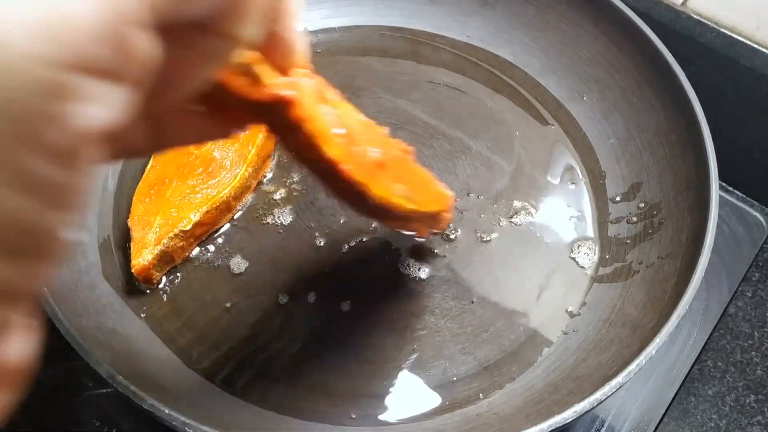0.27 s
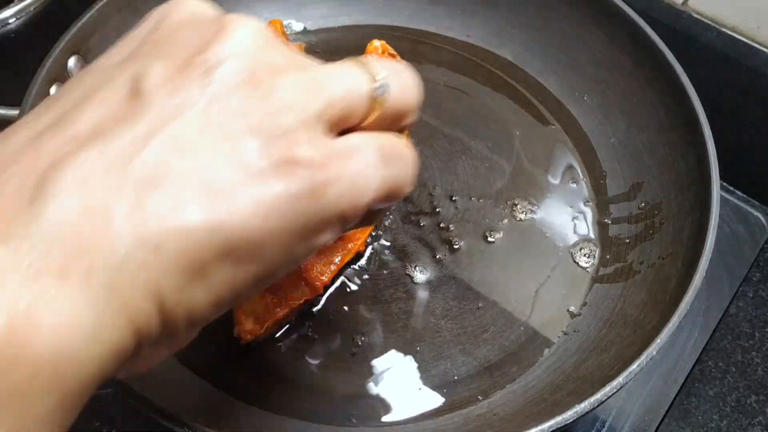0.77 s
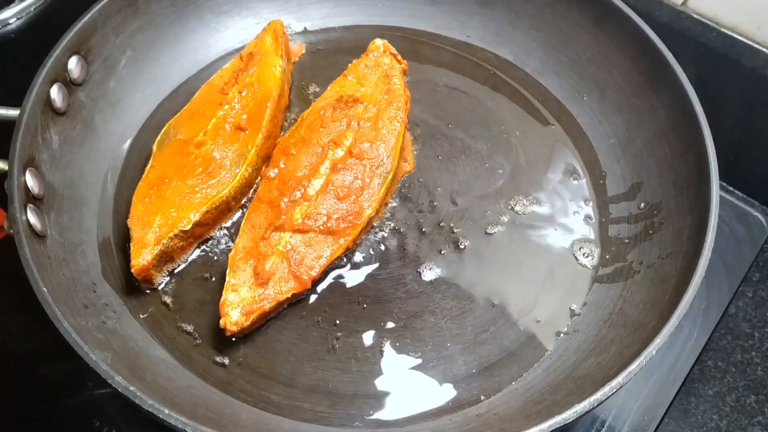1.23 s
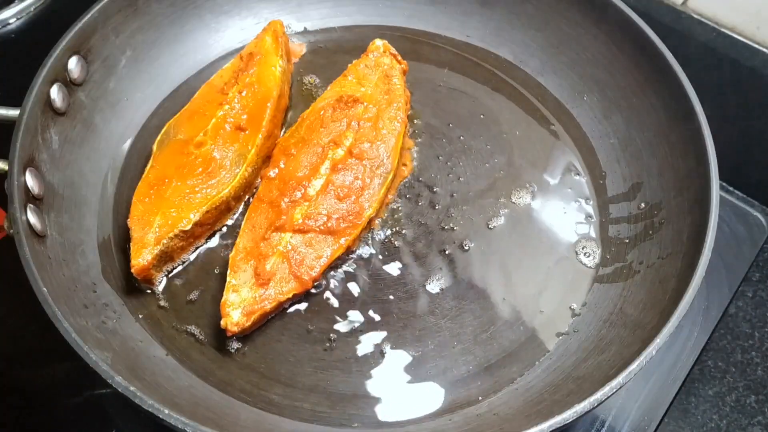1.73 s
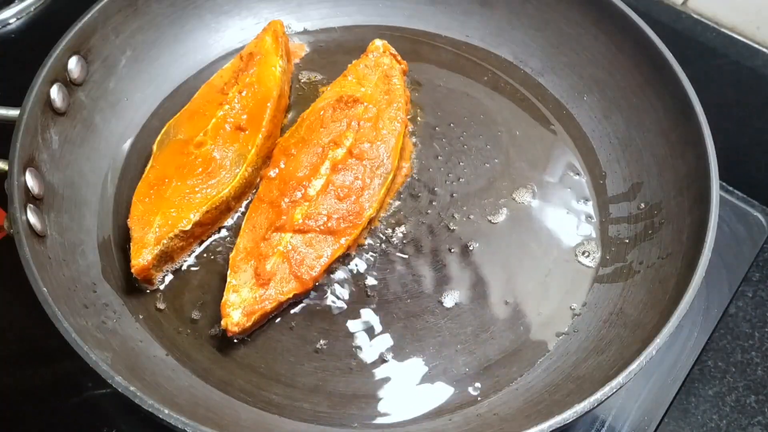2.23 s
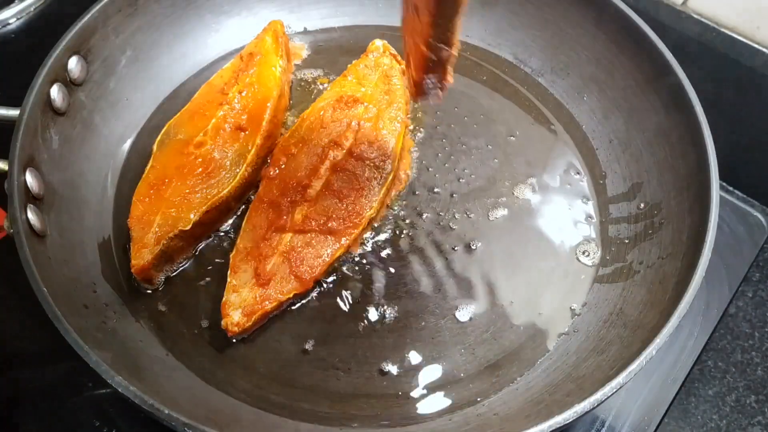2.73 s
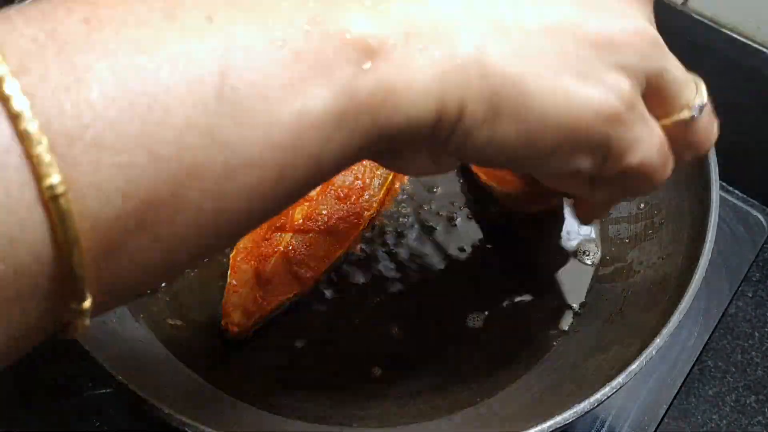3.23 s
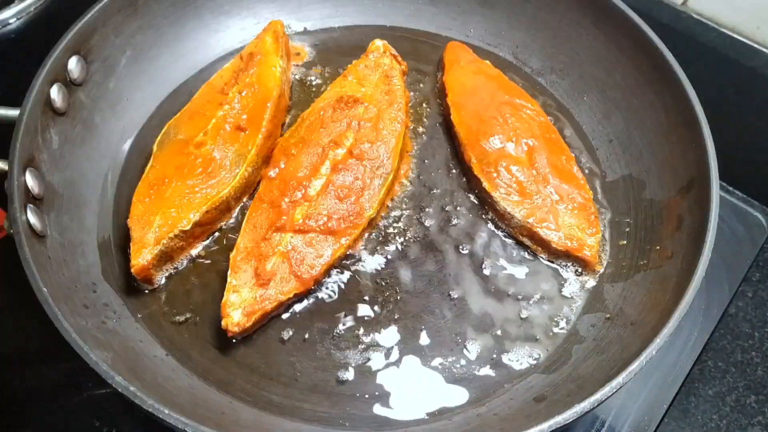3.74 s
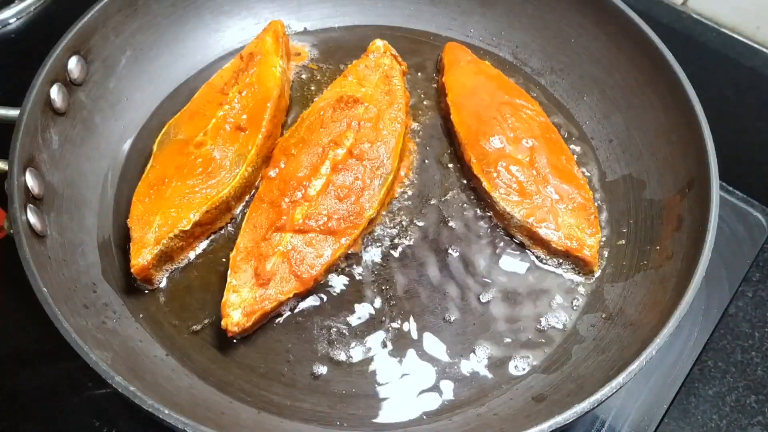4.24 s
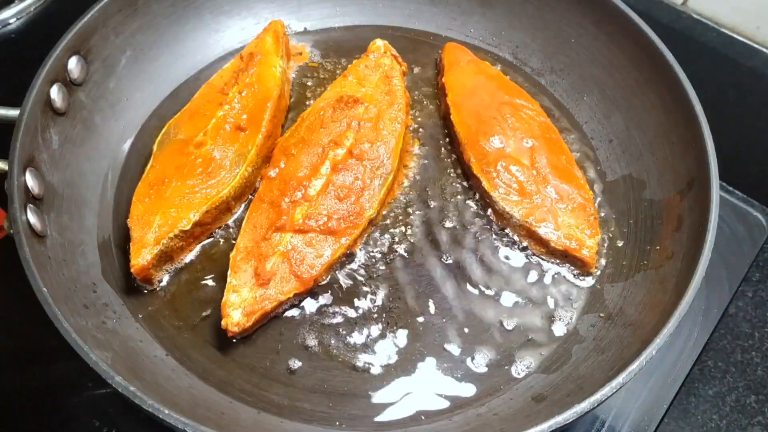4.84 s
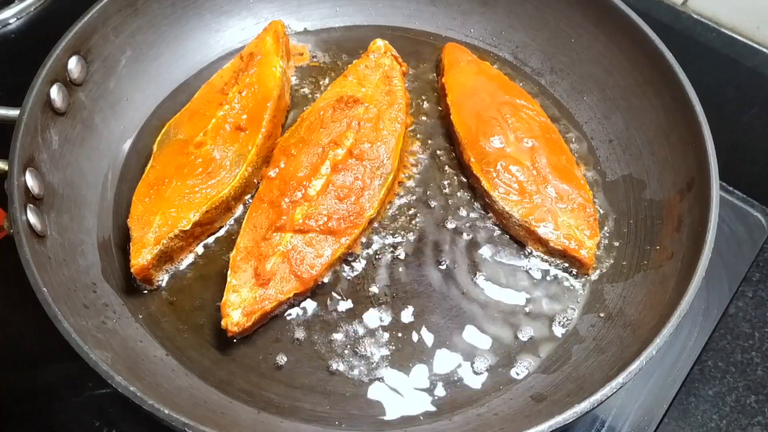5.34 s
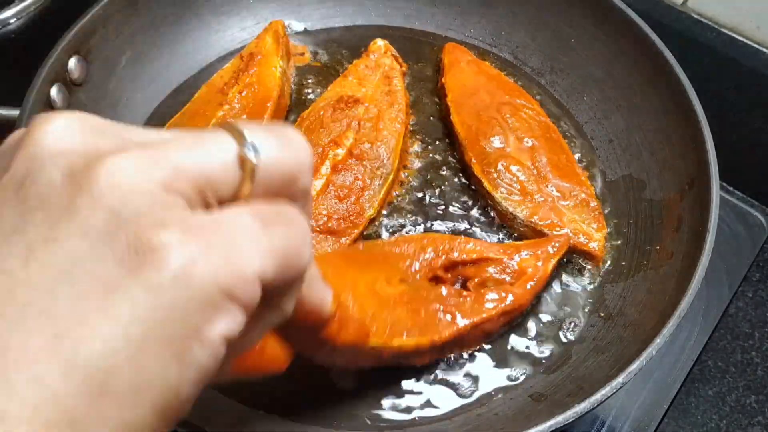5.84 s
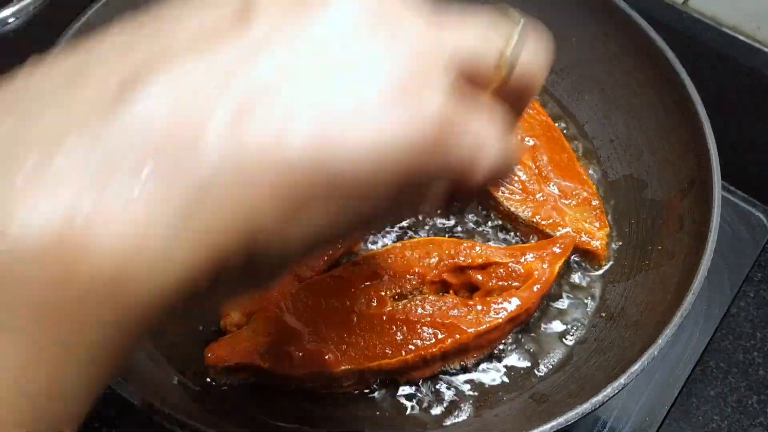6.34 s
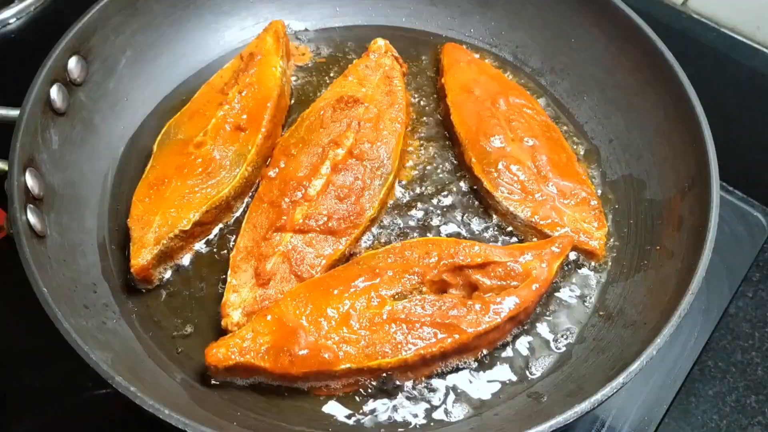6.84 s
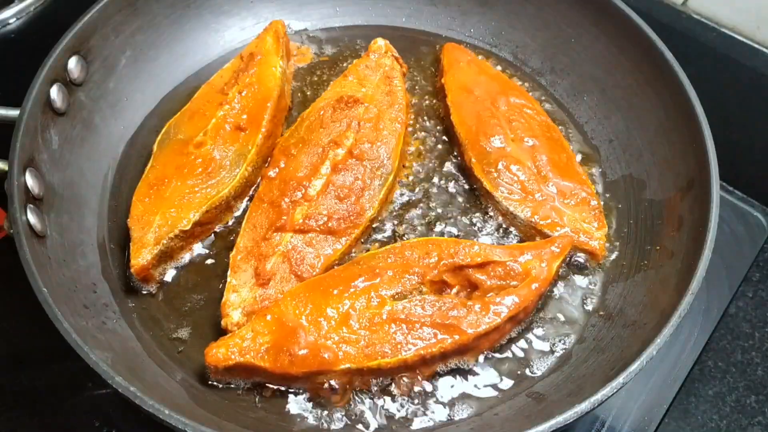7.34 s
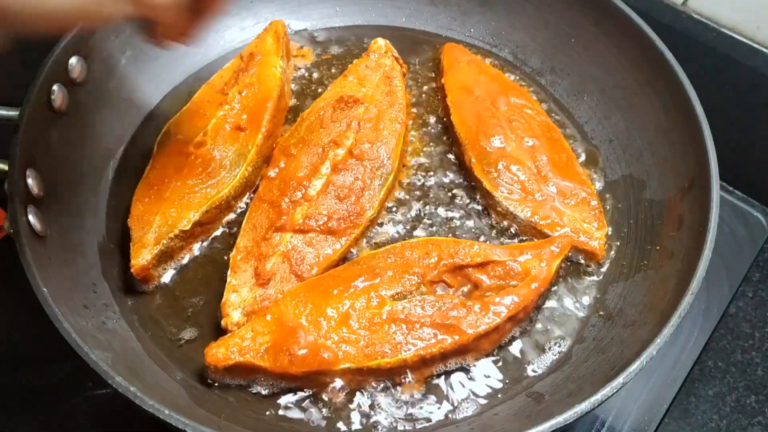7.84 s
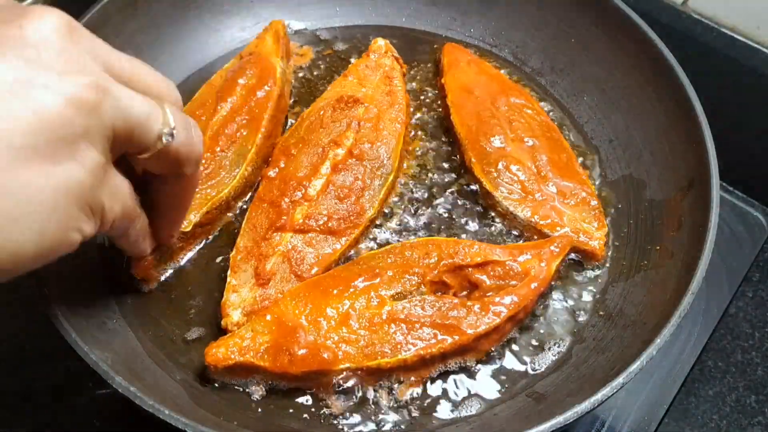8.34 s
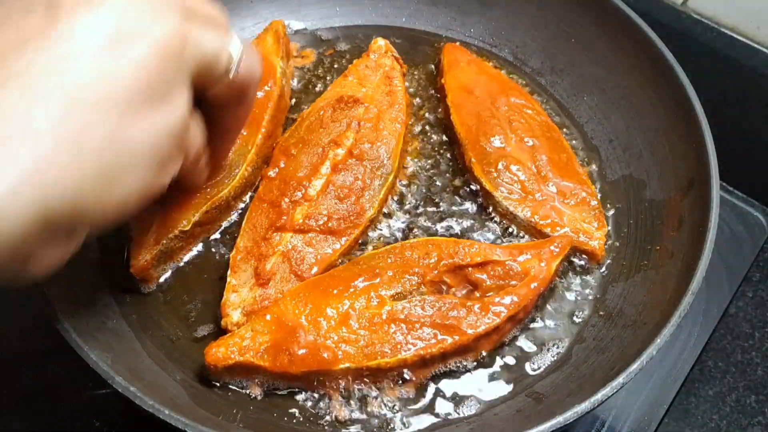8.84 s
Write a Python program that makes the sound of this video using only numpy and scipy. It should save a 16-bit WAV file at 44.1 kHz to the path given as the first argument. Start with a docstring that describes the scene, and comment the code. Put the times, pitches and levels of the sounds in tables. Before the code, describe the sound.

Hot oil quietly crackles and spits in a pan, then wet fish sets off a loud steady sizzle, cutting abruptly to calmer, duller frying.

```python
"""Fish steaks frying in a steel pan

Close over the pan with a two-port microphone, in a kitchen with a running fan.
The oil simmers as swarms of ringing bubbles over hiss, with noise jets spitting and damped bursts popping.
A wet steak sets off a roar of steam bubbles; at 7.74 s a cut with a short fade leads to calmer, duller frying.
Behind it lie filtered noise for air, duct whistles, murmur and rumble, and a hum of wavering sines."""
import sys
import numpy as np
from scipy import signal
from scipy.fft import rfft, irfft
from scipy.io import wavfile
from scipy.ndimage import uniform_filter1d

SR = 44100
rng = np.random.default_rng(int(sys.argv[2]) if len(sys.argv) > 2 else 0)


def inscribe(sig):
    """Save sig as 16-bit PCM at rate SR to the path in sys.argv[1].

    A 1-D sig is mono; a 2-D sig holds one channel per row.
    Samples are clipped to [-1, 1] before scaling.
    """
    pcm = np.round(np.clip(np.atleast_2d(sig).T, -1, 1) * 32767)
    wavfile.write(sys.argv[1], SR, pcm.astype(np.int16))


N = 400869
T = np.arange(N) / SR  # time axis, s
HZ = np.fft.rfftfreq(N, 1 / SR)  # frequency axis, Hz

# likeness of the two ports for the roaring oil: hz, likeness (0-1), right_leads_rad
ROAR_LIKENESS = [(300, .88, 0), (1000, .75, .5), (2400, .33, 1.2), (4500, .22, 2.9), (7000, .3, 2.8),
                 (12000, .33, 3.2), (13500, .2, 4.7), (14600, .27, 6.2)]
# likeness of the two ports for the simmer and the room: hz, likeness (0-1), right_leads_rad
ROOM_LIKENESS = [(60, .96, 0), (130, .96, 0), (290, .77, 0), (700, .66, .2), (1400, .3, .6), (2400, .1, .8),
                 (3500, .2, 3.3), (8000, .25, 6.6), (14000, .08, 7)]


def simmering():
    """Hot oil simmers: sparse bubbles ring over a mostly smooth hiss."""
    # boiling strength: time_s, level_db
    strength = [(0, -29), (.1, -31.5), (.2, -27.5), (.4, -32), (.55, -32), (.9, -29.5), (1.15, -29.5),
                (1.4, -29), (1.52, -27), (1.7, -29.5), (1.82, -29.5), (1.95, -27.5), (2.2, -31),
                (2.3, -29.5), (2.4, -28), (2.6, -38)]
    # colour of the bubbles: hz, spectrum_db
    colour = [(1060, -28), (1800, -11), (2530, 3), (3470, -1.5), (3800, 3.5), (4470, -5), (5030, 4.5),
              (5550, -1.5), (15000, 0.5)]
    return boiling(strength, colour, ROOM_LIKENESS, per_s=600, spread_db=3.0, grainy=0.2,
                   flicker_db=1.2, throb_db=0.5)


def roaring():
    """The wet steak boils off steam in a dense roar of bubbles."""
    # boiling strength: time_s, level_db
    strength = [(2.42, -32), (2.47, -20), (2.54, -18), (2.575, -22.5), (2.63, -17.5), (2.71, -14.5),
                (2.77, -16), (2.81, -13), (2.83, -15), (2.87, -13.5), (2.93, -10), (3.05, -11),
                (3.17, -9.5), (3.33, -11.5), (3.51, -11.5), (4.1, -10.5), (4.77, -10), (4.83, -11.5),
                (4.88, -10), (5.41, -10), (5.46, -12), (5.7, -9.5), (5.87, -11.5), (6.16, -10),
                (6.34, -11.5), (6.67, -10.5), (7.5, -11), (7.56, -13.5), (7.74, -13)]
    # colour of the bubbles: hz, spectrum_db
    colour = [(240, -39), (400, -24), (480, -22.5), (724, -13.5), (1230, -14.5), (1460, -10.5), (1950, -16),
              (2200, -8), (2450, -11.5), (3070, -7.5), (3450, -7.5), (4100, -4.5), (4600, -7.5),
              (5370, -0.5), (5720, -4), (5990, 0.8), (6280, -4), (6560, -0.4), (7000, -1.5), (8900, 0.9),
              (11700, 1.2), (14000, 1.2), (15000, 0)]
    return boiling(strength, colour, ROAR_LIKENESS, per_s=6000, spread_db=2.4, grainy=0.42,
                   flicker_db=0.4, throb_db=0.3)


def calmer_frying():
    """Weaker boiling with a duller colour and more uneven bubbles."""
    # boiling strength: time_s, level_db
    strength = [(7.745, -22), (7.85, -21.5), (8.2, -21), (8.85, -21.5), (8.97, -20.5), (9.05, -25.5),
                (9.09, -20)]
    # colour of the bubbles: hz, spectrum_db
    colour = [(310, -38), (460, -29), (520, -10), (600, -13), (850, -5), (1150, -8), (1440, -5.5),
              (1540, -9.5), (1800, -4), (2490, -6), (2680, -6), (6070, 0.5), (12000, -1.5), (15000, -2.5)]
    # likeness of the two ports: hz, likeness (0-1), right_leads_rad
    likeness = [(300, 0.79, 1), (1010, 0.92, -0.2), (2420, 0.47, -1), (4500, 0.086, 3), (9100, 0.06, 10.5),
                (14000, 0.32, 1.5)]
    return boiling(strength, colour, likeness, per_s=4000, spread_db=3.4, grainy=0.25,
                   flicker_db=0.6, throb_db=0.6)


def boiling(rows, tone, same, per_s, spread_db, grainy, flicker_db, throb_db):
    """Swarms of tiny bubbles burst over a smooth hiss; the sound flickers, throbs and shifts in colour."""
    narrow_db, broad_db = 3.1, 1.45  # random level changes in narrow and in broader bands
    size = amp(spread_db * np.minimum(rng.exponential(1, (2, N)), 5))
    size = size * rng.choice([-1, 1], (2, N))
    bursts = bubbles(size * (rng.random((2, N)) < per_s / SR))
    hiss = rng.standard_normal((2, N))
    swarm = np.sqrt(grainy) * bursts + np.sqrt(1 - grainy) * hiss
    swarm = ports(swarm, amp(read(tone, HZ)), same)
    hz, t, z = signal.stft(swarm, SR, nperseg=512, noverlap=320)
    narrow = evened(uniform_filter1d(rng.standard_normal(z.shape[1:]), size=6, axis=1))
    broad = uniform_filter1d(rng.standard_normal(z.shape[1:]), size=8, axis=0)
    broad = evened(uniform_filter1d(broad, size=12, axis=1))
    swell = np.interp(t, T, flicker_db * drift(30) + throb_db * drift(9.8))
    treble = (1 / (1 + (2000 / (hz + 1)) ** 3))[:, None]  # the treble varies most
    change_db = treble * (narrow_db * narrow + broad_db * broad + swell)
    varied = signal.istft(z * amp(change_db), nperseg=512, noverlap=320)[1][:, :N]
    return evened(varied) * level(rows)


def bubbles(bursts):
    """Each burst rings for a few cycles at the pitch of its bubble size."""
    sizes_hz = [3000, 4500, 6700, 10000, 14500]
    width_share = .4  # width of the ring as a share of its pitch
    size, out = rng.integers(0, len(sizes_hz), N), 0
    for k, hz in enumerate(sizes_hz):
        r = np.exp(-np.pi * width_share * hz / SR)
        resonance = [1, -2 * r * np.cos(2 * np.pi * hz / SR), r * r]
        ring = signal.lfilter([1], resonance, bursts * (size == k))
        out = out + np.sqrt(hz) * evened(ring)
    return evened(out)


def gurgle():
    """Larger bubbles rumble as the wet steak settles, swelling and fading a few times a second."""
    # strength of the gurgle: time_s, level_db
    strength = [(2.6, -55), (2.7, -41), (2.88, -38), (3, -32.5), (3.2, -45), (3.5, -45), (4.5, -45),
                (6, -48), (6.9, -40), (7.74, -50)]
    # colour of the gurgle: hz, spectrum_db
    colour = [(400, -46), (620, 2), (900, -5), (1150, 3), (1500, 2), (1900, 4.5), (2250, -3.5), (2800, -24),
              (4000, -40)]
    noise = ports(rng.standard_normal((2, N)), amp(read(colour, HZ)), ROAR_LIKENESS)
    return noise * level(strength) * amp(3.34 * drift(6.6))


def spurts():
    """Each jet of steam is a gritty puff of noise that swells to its peak and dies away quickly."""
    # jets of steam: peak_s, level_db, rise_ms, centre_hz
    jets = [(.015, -23.5, 23, 11400), (0.033, -25, 7, 12100), (.062, -31, 13, 11000),
            (.141, -25, 16, 10200), (.167, -29, 18, 11400), (.197, -28, 3.3, 8050), (.212, -32, 6, 10500),
            (.247, -26.5, 17, 11400), (0.285, -26, 4.9, 11800), (0.367, -32, 30, 8450),
            (.418, -31, 4, 13400), (.44, -36, 12, 11500), (.461, -26, 1.5, 13300), (.52, -32, 29, 9400),
            (0.546, -32, 12, 10900), (.563, -25, 5.6, 10700), (.578, -24, 2.6, 9900),
            (.602, -27, 9.1, 10000), (.616, -27, 4, 11800), (.671, -21, 3.6, 10500), (.735, -35, 6, 11000),
            (.752, -36, 6.5, 10400), (0.774, -27, 7.1, 9450), (.803, -26.5, 15, 10400),
            (.842, -26, 4.4, 12100), (.861, -24.5, 5.5, 10200), (.889, -25.5, 10, 10300),
            (.912, -28.5, 6.5, 10900), (.955, -38, 12, 11000), (.998, -36, 1.3, 13300),
            (1.019, -21, 5.8, 9700), (1.15, -37, 4, 10700), (1.193, -34, 1.2, 11600),
            (1.225, -27, 4.6, 9500), (1.242, -22.5, 9, 9600), (1.261, -17.5, 3.3, 11500),
            (1.297, -28, 4.6, 11400), (1.357, -20.5, 3, 10000), (1.425, -30, 5, 10000),
            (1.446, -24, 12, 9400), (1.48, -22, 11, 9400), (1.497, -24, 5, 11000), (1.515, -30, 6, 11000),
            (1.544, -24, 3.5, 13200), (1.612, -23, 21, 10000), (1.665, -34, 3, 11700),
            (1.712, -25, 5, 9800), (1.743, -21, 16, 10200), (1.762, -23.5, 7, 11000),
            (1.847, -28, 1.2, 10400), (1.857, -21.5, 4, 10000), (1.894, -24, 2.9, 10700),
            (1.923, -29, 2.3, 7700), (1.983, -27.5, 4, 11000), (2.021, -22, 5.5, 11200),
            (2.083, -27, 1.3, 8800), (2.106, -26, 3, 10400), (2.122, -29, 6.3, 5500), (2.13, -31, 2, 13300),
            (2.226, -21.5, 1.8, 10000), (2.274, -27.5, 23, 10600), (2.329, -31, 1.3, 10300),
            (2.375, -19.5, 7.4, 11100), (2.43, -34, 6, 10000), (2.541, -21, 5, 11700),
            (2.717, -22, 7, 11000), (2.81, -24, 6, 11000), (2.935, -20.5, 6, 11000),
            (3.168, -14.5, 6, 11000), (3.335, -10, 3.4, 12500), (3.911, -14, 2.3, 11600),
            (5.197, -16, 3, 7900), (5.424, -22, 3, 11500), (7.875, -25, 5, 8000), (8.013, -23, 5, 8600),
            (8.219, -25, 5.4, 9400), (8.392, -24, 5, 8700), (8.986, -21, 5, 9800)]
    width_hz, pan_db, scatter_db = 4140, -0.5, 5.5  # pan is left minus right
    ring_hz, ring_width_hz, ring_db = 8000, 490, -9.5  # the pan colours each jet
    fall_ms, fall_shape = 5.2, 1.3  # higher shape = the jet stops more abruptly
    sputter_db = -3
    out, t = np.zeros((2, N)), np.arange(-4096, 4096) / SR
    for s, db, rise_ms, hz in jets:
        noise, grit = rng.standard_normal((2, len(t))), rng.standard_normal(len(t))
        side = rng.standard_normal()
        rise = abs(1000 * t / rise_ms) ** 1.4
        fall = abs(1000 * t / fall_ms) ** fall_shape
        shape = np.exp(-np.where(t < 0, rise, fall) / 2)
        sputter = sputter_db * evened(uniform_filter1d(grit[::-1], size=40))
        gritty = noise * amp(3.2 * np.clip(grit, -2, 2) + sputter)
        puff = band_of(gritty, hz, width_hz)
        puff = puff + amp(ring_db) * band_of(gritty, ring_hz, ring_width_hz)
        add(out, s + t[0], amp(db) * evened(puff) * shape, pan_db + scatter_db * side)
    return out


def pops():
    """Large bubbles burst: a quickly damped ring, two echoes off the pan wall, a spray of droplets."""
    # single large bubbles: time_s, level_db, centre_hz
    large = [(0.0308, -8, 12400), (0.1396, -12, 10600), (0.1635, -10, 11300), (0.1945, -12, 7800),
             (0.2275, -18, 6100), (0.2372, -13, 13000), (0.2475, -12, 11500), (0.2724, -13, 13900),
             (0.2824, -13, 12200), (0.2954, -17, 10400), (0.313, -18, 6500), (0.4155, -9, 14300),
             (0.4594, -10, 15400), (0.5751, -3, 10900), (0.6, -13, 8390), (0.613, -7, 13200),
             (0.6434, -16, 8100), (0.7008, -9, 14300), (0.7223, -19, 12500), (0.7492, -13, 9500),
             (0.828, -16, 14000), (0.8395, -9, 11500), (0.848, -13, 9000), (0.9015, -15, 12000),
             (0.9088, -12, 10500), (0.9274, -18, 6170), (0.9454, -18, 12000), (0.9951, -10, 13600),
             (0.9975, -13, 13500), (1.048, -11, 15300), (1.1912, -9, 11000), (1.2124, -15, 8410),
             (1.2674, -13, 15100), (1.5054, -11, 13000), (1.5279, -11, 8260), (1.5424, -11, 15100),
             (1.5653, -9, 14000), (1.6394, -17, 7450), (1.6626, -13, 10300), (1.741, -10, 11000),
             (1.8452, -13, 9530), (1.8921, -7, 10400), (1.9484, -16, 14000), (1.9604, -17, 10400),
             (1.987, -17, 12500), (2.053, -18, 12000), (2.0807, -12, 8660), (2.1034, -8, 13300),
             (2.1121, -7, 5330), (2.129, -10, 13500), (2.175, -11, 14500), (2.193, -15, 14000),
             (2.236, -12, 9500), (2.272, -12, 10000), (2.3266, -12, 11500), (2.5391, -7, 14700),
             (2.5824, -13, 9700), (2.717, -7, 11000)]
    width_share, sharpness = .32, 1.15  # width of a burst as a share of its pitch
    delay_s = .0013  # fixed delay from the listed time to the burst
    pan_db_per_khz, middle_hz, scatter_db = .5, 11500, 1.5  # duller pops lie to the right
    out, t = np.zeros((2, N)), np.arange(-64, 1984) / SR
    for s, db, hz in large + weak_pops():
        spray, place = rng.standard_normal((2, len(t))), rng.random((2, 3))
        side = rng.standard_normal()
        # the burst and its two echoes reach each port at their own times, s
        arrive = np.array([-.0001, .0008, .0022]) + place * [.00002, .0006, .0014]
        since = np.maximum(t - arrive[..., None], 0)
        damped = sharpness * width_share * hz * since
        click = 2 * damped * np.exp(1 - 2 * damped) * np.sin(2 * np.pi * hz * since)
        click = (click * amp([[0], [-7], [-11]])).sum(1)
        spray = evened(band_of(spray, hz, .6 * width_share * hz))
        tail = spray * (t > .0004) * amp(-15 - 60 * t / .03)
        pan_db = pan_db_per_khz * (hz - middle_hz) / 1000 + scatter_db * side
        add(out, s + delay_s + t[0], amp(db) * (click + tail), pan_db)
    return out


def weak_pops():
    """Ten faint bursts of chance time and pitch, as rows of time_s, level_db, centre_hz."""
    count, until_s, level_db = 10, 4.3, -29
    return [(rng.uniform(0, until_s), level_db, rng.uniform(8600, 15400)) for _ in range(count)]


def add(mix, s, sound, pan_db):
    """Places a two-port sound at s, its left port louder than its right by pan_db."""
    at = round(s * SR)
    part = mix[:, max(at, 0):at + sound.shape[1]]
    part += sound[:, max(-at, 0):] * amp([[pan_db / 2], [-pan_db / 2]])


def room_air():
    """Kitchen air as coloured noise, mostly alike at both ports in the bass."""
    # colour of the air: hz, spectrum_db
    colour = [(21, -35), (35, -9), (117, -4), (304, -14.5), (664, -11), (770, -7.5), (1020, -12),
              (1530, -6.5), (1850, -10), (2540, -9), (3000, -49), (3900, -55), (6600, -120)]
    # strength of the air: time_s, level_db
    strength = [(0, -41), (2.5, -38.5), (3, -40), (7.7, -40.5), (7.78, -44), (9.09, -41.5)]
    return ports(rng.standard_normal((2, N)), amp(read(colour, HZ)), ROOM_LIKENESS) * level(strength)


def fan_whistles():
    """The fan duct whistles: noise passed through narrow resonances."""
    # duct whistles: centre_hz, width_hz, relative_db
    whistles = [(769, 30, 2), (887, 43, 3), (920, 40, -5), (1118, 50, -4.5), (1347, 27, -5),
                (1533, 80, 2.2), (625, 30, -7.5)]
    # strength of the whistles together: time_s, level_db
    strength = [(0, -45.5), (1.2, -42), (2.6, -43.5), (3.1, -47), (3.8, -48), (7.74, -51)]
    return ports(rng.standard_normal((2, N)), bands(whistles), ROOM_LIKENESS) * level(strength)


def murmur():
    """A faint low murmur of noise through one narrow resonance."""
    # strength of the murmur: time_s, level_db
    strength = [(.9, -70), (1.3, -59), (1.8, -54), (2.2, -57), (2.5, -68)]
    resonance = bands([(429, 21, 0)])  # centre Hz, width Hz, dB
    return ports(rng.standard_normal((2, N)), resonance, ROOM_LIKENESS) * level(strength)


def rumble():
    """A deep rumble of noise around 22 Hz whose strength wanders slowly."""
    # strength of the rumble before it wanders: time_s, level_db
    strength = [(0, -40), (.4, -47), (2.5, -41.5), (4.3, -44), (4.8, -49), (5.6, -44), (6.6, -51),
                (7.1, -43), (7.7, -49), (9.09, -48)]
    resonance = bands([(22.2, 10.0, 0)])  # centre Hz, width Hz, dB
    deep = ports(rng.standard_normal((2, N)), resonance, ROOM_LIKENESS)
    return deep * level(strength) * amp(1.5 * drift(1.1))


def hum():
    """A main tone that swells now and then, a faint upper tone and weaker ones, alike at both ports."""
    # strength of the main tone before it wavers: time_s, level_db
    main_strength = [(0, -45), (.2, -39.5), (.66, -57), (1.16, -29.5), (1.38, -58), (1.5, -47), (1.85, -34),
                     (2.2, -40.5), (2.9, -45), (4, -41), (4.5, -43.5), (4.9, -51), (5.7, -54), (6.1, -46),
                     (6.7, -55), (7.2, -42.5), (7.65, -44), (7.8, -57), (8.28, -51), (8.45, -43),
                     (9.09, -67)]
    # strength of the upper tone before it wavers: time_s, level_db
    upper_strength = [(0, -53), (2.2, -59), (2.8, -52), (4.1, -60), (4.4, -51), (6.9, -56), (7.3, -56),
                      (9.09, -67)]
    # weaker tones around the main one: pitch_hz, relative_db
    weaker_tones = [(74, -1.5), (92, -2), (127, 0), (151, -12.5)]
    # strength shared by the weaker tones: time_s, level_db
    weaker_strength = [(0, -49), (.7, -47), (1.4, -40.5), (2.2, -53), (2.8, -53), (4, -55.5), (5.6, -50),
                       (7.2, -51), (7.7, -48), (7.8, -65), (9.09, -54)]
    main = wavering(108.7, wander_db=0) * level(main_strength)
    upper = wavering(205.4, wander_db=1.2) * level(upper_strength)
    weaker = sum(amp(db) * wavering(hz, wander_db=2.5) for hz, db in weaker_tones)
    return main + upper + weaker * level(weaker_strength)


def wavering(hz, wander_db):
    """A low tone whose pitch and strength wander."""
    turns = np.cumsum(hz * (1 + .016 * drift(1.5))) / SR + rng.random()
    strength_db = wander_db * drift(3.3) + 3.44 * drift(26.0)
    return amp(strength_db) * np.sin(2 * np.pi * turns)


def amp(db):
    """dB to gain."""
    return 10 ** (np.asarray(db) / 20)


def evened(x):
    """Scales to rms 1."""
    return x / np.sqrt(np.mean(x ** 2) + 1e-20)


def read(points, hz, column=1):
    """Reads a spectrum table on a log-frequency axis, flat above 15 kHz."""
    table = np.transpose(points)
    return np.interp(np.log(np.minimum(hz, 15000) + 1), np.log(table[0] + 1), table[column])


def level(rows):
    """Gain curve of a (s, dB) table, silent outside its span but for short fades at both ends."""
    s, db = np.transpose(rows)
    inside_s = np.minimum(T - s[0] + 0.013, s[-1] + 0.0082 - T)
    return amp(np.interp(T, s, db)) * np.clip(inside_s / 0.015, 0, 1)


def bands(rows):
    """Gain over frequency of a set of (Hz, width Hz, dB) resonances with equal-shaped skirts."""
    power = sum(amp(2 * db) / w / (1 + (2 * (HZ - f) / w) ** 2) ** 2 for f, w, db in rows)
    return np.sqrt(power)


def band_of(x, hz, width_hz):
    """Bell-shaped band around hz."""
    f = np.fft.rfftfreq(x.shape[-1], 1 / SR)
    return irfft(rfft(x) * np.exp(-((f - hz) / width_hz) ** 2), x.shape[-1])


def drift(hz):
    """Slow chance, rms about 1, fading out above about hz."""
    count = 2 ** 14
    f = np.fft.rfftfreq(count, T[-1] / count)
    slow = irfft(rfft(rng.standard_normal(count)) / (1 + (f / hz) ** 2) * (f > .5))
    return np.interp(T, np.linspace(0, T[-1], count), evened(slow))


def ports(pair, gain, same):
    """Colours two unrelated signals; blends the first, phase-shifted, into the second where ports agree."""
    left, other = rfft(pair, axis=1) * gain
    likeness = np.clip(read(same, HZ), 0, 1)
    lead = np.exp(1j * read(same, HZ, column=2))
    right = likeness * lead * left + np.sqrt(1 - likeness ** 2) * other
    return evened(irfft(np.array([left, right]), N, axis=1))


def scene():
    """The three stages of frying with gurgle, jets and pops, and the kitchen behind them."""
    frying = simmering() + roaring() + calmer_frying() + gurgle() + spurts() + pops()
    kitchen = room_air() + fan_whistles() + murmur() + rumble() + hum()
    return frying + kitchen


def record(dry):
    """Microphone port balance, a short fade through the cut, hard overload and a steep treble limit."""
    # balance of the microphone ports: hz, left_minus_right_db
    balance = [(60, 0), (130, 2.5), (290, -0.5), (640, 0), (1410, 0.0), (3100, 0.5), (6820, -0.5),
               (15000, 2)]
    cut_s, cut_fade_s, edge_hz = 7.743, 0.0079, 15740
    tilt = read(balance, HZ) / 2
    x = irfft(rfft(dry, axis=1) * amp([tilt, -tilt]), N, axis=1)
    cut_fade = np.clip(abs(T - cut_s) / cut_fade_s, .1, 1)  # down to a tenth and back
    x = np.clip(x * cut_fade, -1, 1)
    lowpass = signal.firwin(1535, edge_hz, window=("kaiser", 9), fs=SR)
    return signal.oaconvolve(x, lowpass[None], "same")


dry = scene()
out = record(dry)
inscribe(out)
```